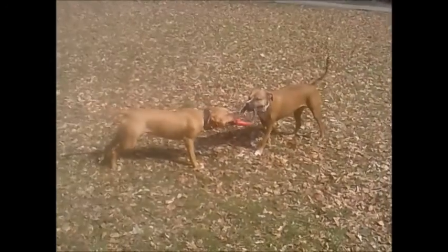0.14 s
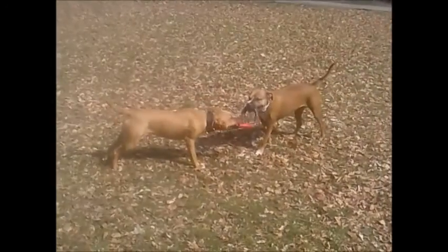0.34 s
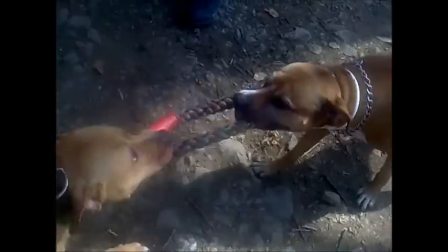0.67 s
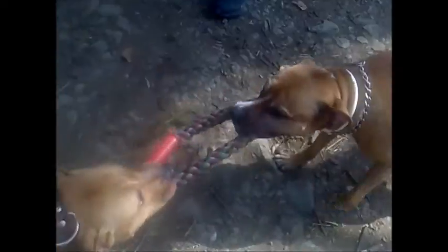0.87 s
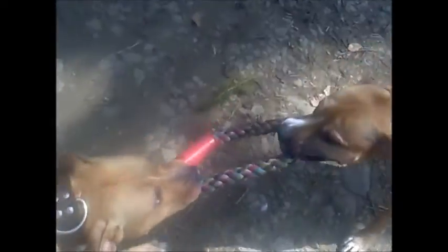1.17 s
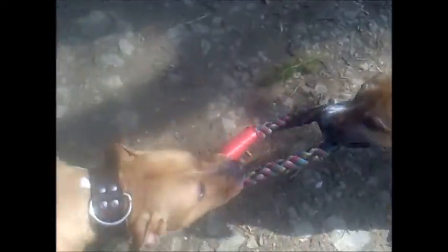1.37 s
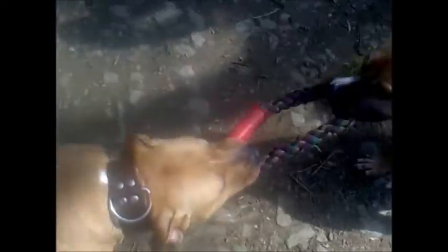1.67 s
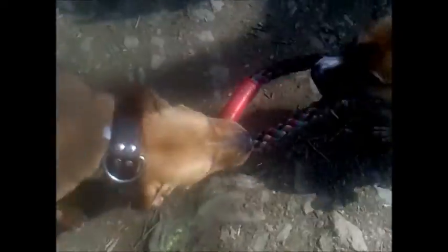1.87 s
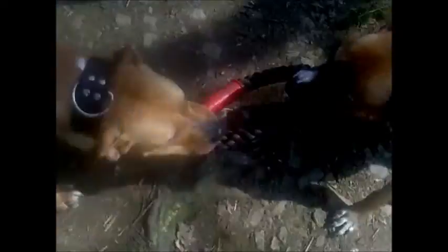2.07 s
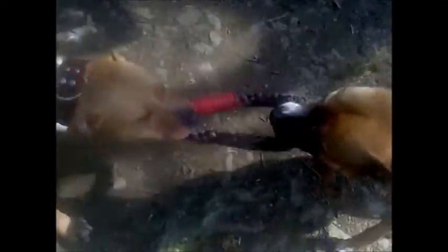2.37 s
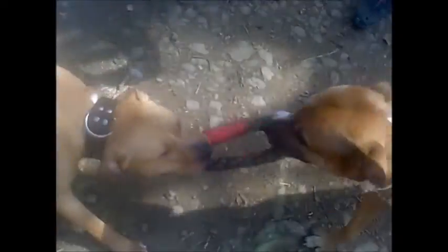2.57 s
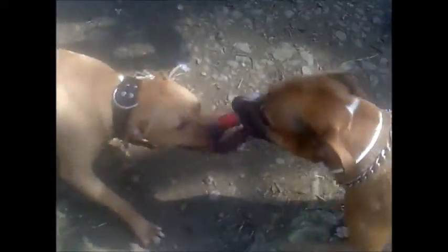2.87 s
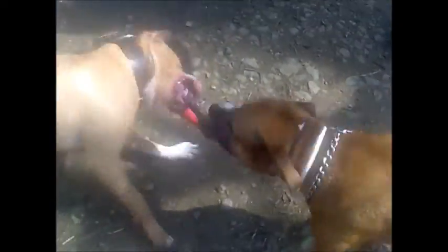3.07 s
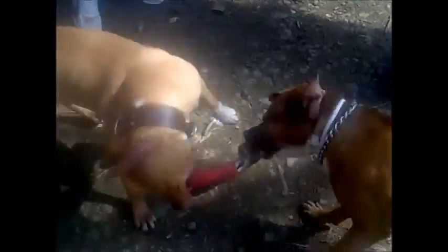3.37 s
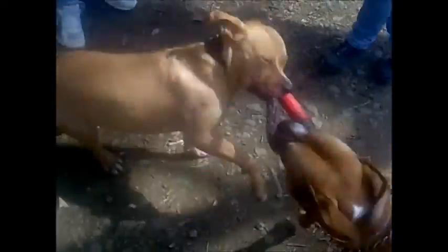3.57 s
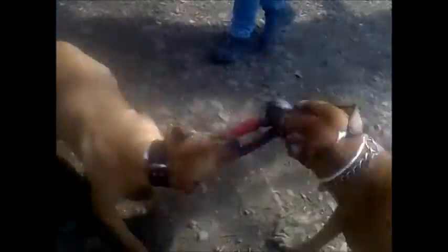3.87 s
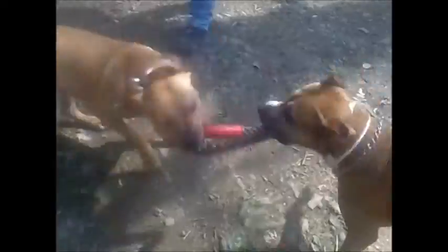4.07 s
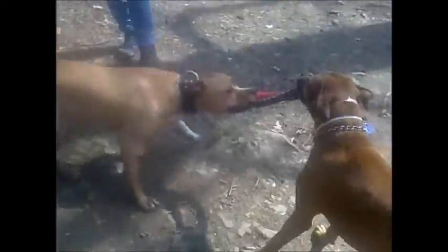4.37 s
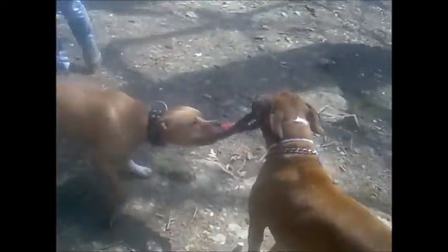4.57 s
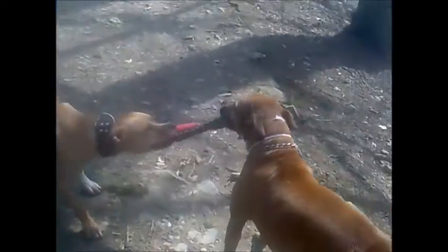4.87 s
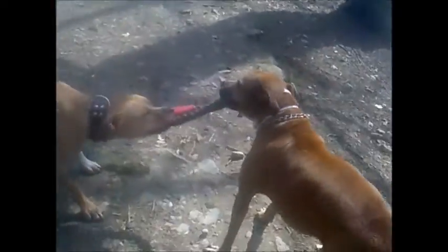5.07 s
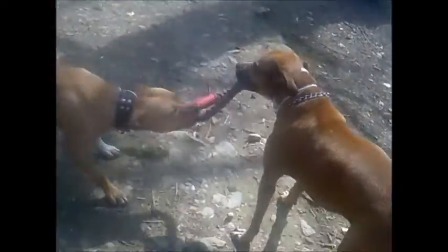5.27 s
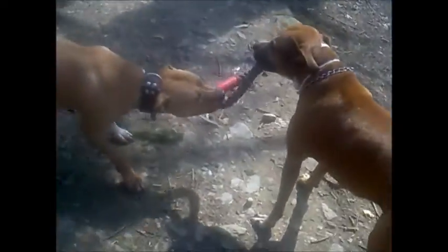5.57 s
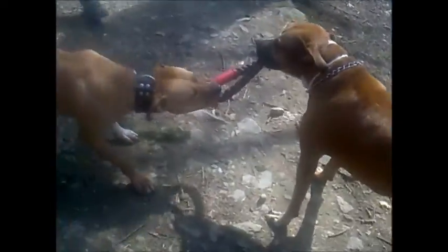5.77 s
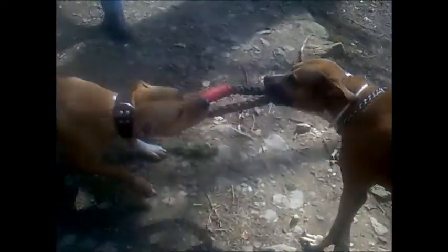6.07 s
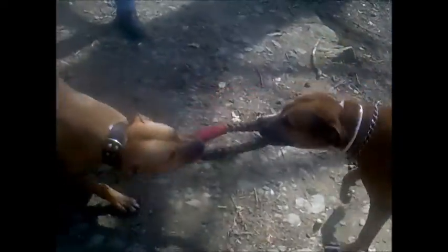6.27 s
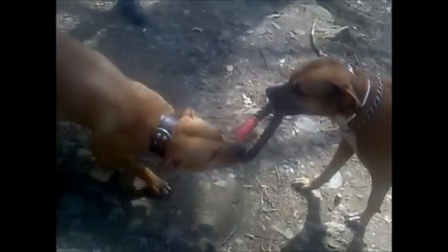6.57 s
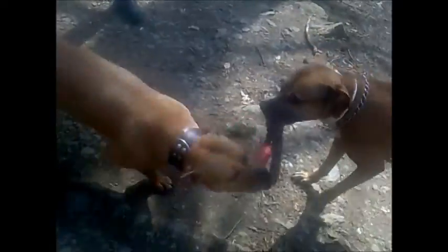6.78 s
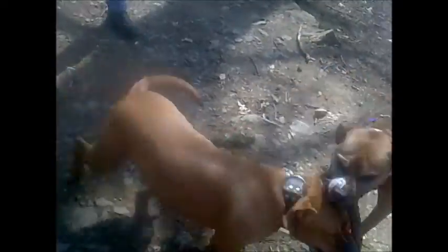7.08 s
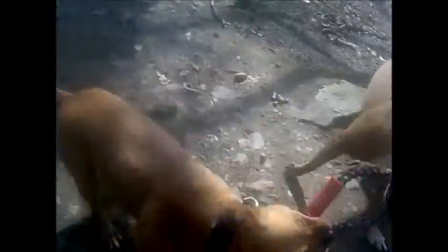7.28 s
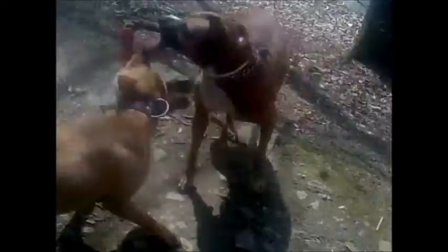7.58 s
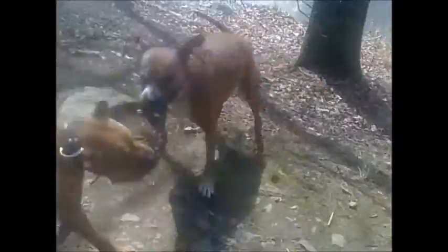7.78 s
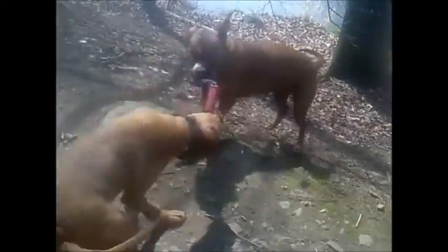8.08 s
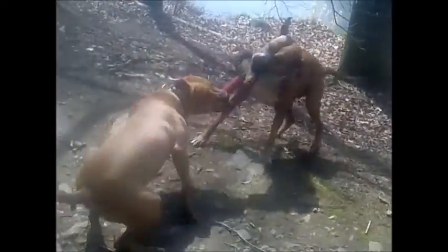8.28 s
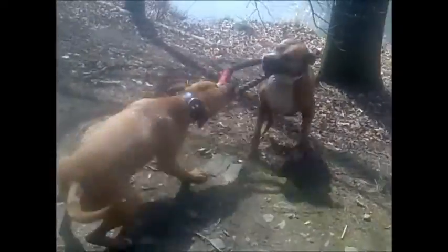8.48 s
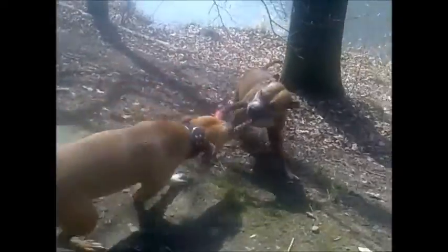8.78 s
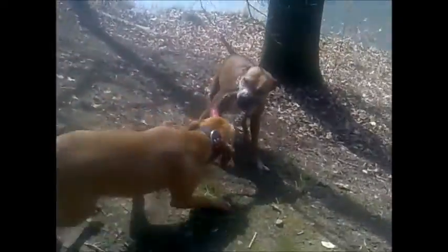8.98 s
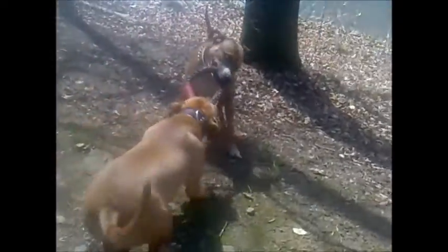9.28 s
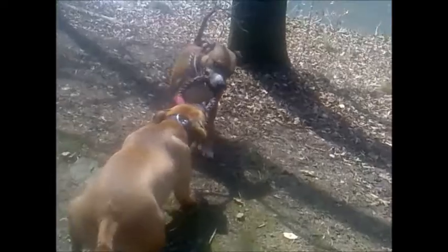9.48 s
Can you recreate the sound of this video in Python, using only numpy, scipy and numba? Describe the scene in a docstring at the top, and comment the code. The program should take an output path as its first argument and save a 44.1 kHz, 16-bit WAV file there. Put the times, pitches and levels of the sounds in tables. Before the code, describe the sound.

Outdoors, soft air and far birds last under a second before the sound drops out. Close rough dog growls follow on bare dirt, wet and raspy with chest resonance, jolted by tugging. Short choppy snarls tumble together, ease into subdued grumbling, then surge again. A steel collar clinks lightly, grit shifts underfoot, low handling rumble swells, and trees return a faint dull echo.

```python
"""Two big dogs tugging a rope toy

A short quiet scene on a leafy lawn with birds; after a brief dropout the dogs growl and snarl on bare dirt.
Uneven noisy vocal pulses, shaken by a slow flutter, ring moving throat resonances, chest, lips and teeth.
Long growls alternate with flurries of short snarls; a chain collar clinks as decaying steel modes.
Filtered noise makes crunches, grit, air and rumble; bird notes are gliding sines; the loudest peaks overload."""
import sys
import numpy as np
from scipy import signal
from scipy.io import wavfile
from scipy.ndimage import uniform_filter1d, map_coordinates
from numba import njit

SR = 44100
rng = np.random.default_rng(int(sys.argv[2]) if len(sys.argv) > 2 else 0)


def file_out(sig):
    """Save sig as 16-bit WAV at sys.argv[1]."""
    # one column per channel
    cols = np.atleast_2d(sig).T
    # limit, then scale
    lim = np.clip(cols, -1, 1)
    pcm = np.round(lim * 32767).astype(np.int16)
    wavfile.write(sys.argv[1], SR, pcm)


N = 425124
T = np.arange(N) / SR
TICKS = np.arange(0, T[-1] + .002, .001)  # control times, s

# silence between lawn and dirt: start_s, end_s
GAP_S = (0.685, 0.838)


def amp(db):
    """Decibels to gain."""
    return 10 ** (np.asarray(db) / 20)


def unit(x):
    """Scales to rms 1."""
    return x / np.sqrt(np.mean(x ** 2) + 1e-20)


def steady(x, seconds):
    """Holds the rms near 1 over the given time, keeping faster flicker."""
    size = max(int(seconds * SR), 8)
    power = uniform_filter1d(uniform_filter1d(x ** 2, size), size)
    return x / np.sqrt(abs(power) + 1e-12)


def wander(rate_hz):
    """Smooth random curve of rms 1 that changes about rate_hz times a second."""
    own_rng = np.random.default_rng(rng.integers(2 ** 30))
    knots = own_rng.standard_normal(int(T[-1] * rate_hz) + 2)
    return unit(map_coordinates(knots, [T * rate_hz], order=3, mode="nearest"))


def add(mix, start_s, sound):
    """Mixes a sound in at start_s."""
    part = mix[max(round(start_s * SR), 0):][:len(sound)]
    part += sound[:len(part)]


def colour(x, outline, size=4096):
    """Causal minimum-phase filter with the outline (hz, gain_db)."""
    hz, db = np.transpose(outline)
    log_bins = np.log(abs(np.fft.fftfreq(size, 1 / SR)) + 1)
    log_gain = np.log(amp(np.interp(log_bins, np.log(hz), db)))
    taps = np.fft.ifft(np.exp(np.conj(signal.hilbert(log_gain)))).real
    return signal.oaconvolve(x, taps[:size // 2])[:len(x)]


@njit
def smooth_twice(x, r):
    """Two one-pole low-passes in a row whose pole r may move."""
    out, a, b = np.zeros_like(x), 0j, 0j
    for i in range(len(x)):
        a = r[i] * a + (1 - r[i]) * x[i]
        b = r[i] * b + (1 - r[i]) * a
        out[i] = b
    return out


def resonate(x, hz, width_hz):
    """Steep resonance that may move: shift down to zero, smooth, shift back."""
    turn = np.exp(2j * np.pi * np.cumsum(hz * np.ones(len(x))) / SR)
    pole = np.exp(-np.pi * abs(width_hz) / SR) * np.ones(len(x))
    return 2 * (turn * smooth_twice(x / turn, pole)).real


def growls_and_snarls(first_width_factor=1.15, second_width_hz=360, third_width_hz=390, chest_width_hz=190,
                      lip_hz=3030, lip_width_hz=650, quiver=0.046, hold_s=0.032, even_s=0.037, hiss=0.14,
                      second_trim_db=1.5, chest_trim_db=-0.4, lip_trim_db=-4.0, rasp_trim_db=-1.14):
    """Pulses ring three throat resonances that move with the jaw, boom in the chest, buzz at lips and teeth."""
    # throat filter with a dip near 3.2 kHz: hz, gain_db
    muzzle_outline = [(100, -9), (290, -4.5), (480, 3.5), (800, 4.5), (980, 5.5), (1250, 3.5), (2200, 2.5),
                      (2600, 1), (3200, -24.5), (6000, -2)]
    # chest wall filter: hz, gain_db
    chest_outline = [(20, -31.5), (55, -2), (90, 2), (190, 2.5), (260, 3), (330, 8.5), (600, -5)]
    # teeth filter: hz, gain_db
    rasp_outline = [(2500, -11), (3700, 4.5), (4300, 1), (5300, 3), (6500, -1.5), (8500, -16.5),
                    (12000, -12), (16000, -31)]

    (effort_db, first_hz, first_width_hz, second_hz, third_hz,
     second_db, third_db, chest_db, lip_db, rasp_db, damping) = jaw()
    pulses, puffs, chest_hz = larynx()
    drive = bounce(pulses)
    throat = colour(drive, muzzle_outline)
    shake = 1 + quiver * wander(30)  # the shaking head bends throat and lip resonances together

    first = resonate(throat, first_hz * shake, first_width_factor * first_width_hz)
    voice = amp(resonance_flicker()) * steady(first, hold_s)
    second = resonate(throat, second_hz * shake, damping * second_width_hz)
    voice += amp(second_db + second_trim_db + resonance_flicker()) * steady(second, hold_s)
    third = resonate(throat, third_hz * shake, damping * third_width_hz)
    voice += amp(third_db + resonance_flicker()) * steady(third, hold_s)
    voice = steady(voice, even_s)

    boom = resonate(colour(drive, chest_outline), chest_hz, damping * chest_width_hz)
    voice += amp(chest_db + chest_trim_db) * steady(boom, hold_s)
    spray = lips(puffs + hiss * rng.standard_normal(N))
    buzz = resonate(spray, lip_hz * shake, damping * lip_width_hz)
    voice += amp(lip_db + lip_trim_db) * steady(buzz, hold_s)
    voice += amp(rasp_db + rasp_trim_db) * steady(colour(spray, rasp_outline), hold_s)
    return voice * effort(effort_db)


def larynx(fold_hz=150, jitter=.28, shimmer_db=4.0, flutter_jitter=.12, lurch_db=2.5, puff_s=0.0099, leak=0.32):
    """Slack folds slap shut unevenly, each slap freeing a puff of air; loose tissue shakes them in a flutter."""
    # voice state: time_s, flutter_hz, flutter_depth_db, roughness (0-1), chest_hz
    voice_state = [(1.0, 58, 3.5, .45, 140), (2.1, 58, 3.2, .5, 135), (2.9, 58, 3.5, .5, 120),
                   (3.3, 58, 2.5, .55, 180), (4.3, 57, 2.5, .5, 180), (4.7, 70, 4, .55, 150),
                   (5.5, 70, 4, .55, 140), (5.9, 56, 3.5, .5, 125), (6.5, 54, 4.5, .5, 135),
                   (7.1, 56, 2, .55, 160), (8.0, 56, 2.5, .5, 190), (9.1, 55, 4.5, .55, 195)]
    s, *columns = np.transpose(voice_state)
    flutter_hz, depth_db, rough, chest_hz = (np.interp(T, s, c) for c in columns)

    shakes = np.cumsum(flutter_hz * np.exp(flutter_jitter * wander(60))) / SR
    flutter = amp(depth_db * np.cos(2 * np.pi * shakes) + lurch_db * wander(70))
    cycles = np.cumsum(fold_hz * np.exp(jitter * wander(170))) / SR
    closures = np.diff(np.floor(cycles), prepend=0)
    slaps = closures * amp(shimmer_db * wander(200)) * flutter
    opening = unit(signal.lfilter([1], [1, -np.exp(-1 / (puff_s * SR))], slaps))
    puffs = unit((opening + leak * flutter) * rng.standard_normal(N))
    return (1 - rough) * unit(slaps) + rough * puffs, puffs, chest_hz


def bounce(x, delay_s=0.00301, strength=0.45, sway=0.098):
    """A close reflection combs the tone; its delay sways as the heads move."""
    late = np.arange(N) - SR * delay_s * (1 + sway * wander(4))
    return x - strength * np.interp(late, np.arange(N), x)


def resonance_flicker(depth_db=2.0, rate_hz=45):
    """Random level in dB, drawn for each resonance, so that their balance flickers."""
    return depth_db * wander(rate_hz)


def lips(x, count=9, flicker_db=5.0, flicker_hz=22):
    """Flapping lips favour now one, now another narrow band of the spray."""
    out = x
    for hz in np.geomspace(2600, 8000, count):
        out = out + (amp(flicker_db * wander(flicker_hz)) - 1) * resonate(x, hz, hz / 10)
    return out


def effort(db, level_db=-0.84, loud_db=-13.0, push=0.14, heave_db=1.2, heave_hz=35, jolt_s=0.004):
    """Voice gain: effort that heaves at random, jolted by tugs on the rope and pushed harder at the peaks."""
    # rope tugs: time_s, jolt_db
    tugs = [(1.279, 3.5), (1.379, 6), (1.431, 7.5), (2.139, 7), (2.457, 8), (2.775, 5.5), (3.235, -0.5),
            (3.727, 5.5), (4.336, 4), (6.37, -5), (6.472, 5.5), (6.692, 12), (6.87, 9), (6.911, 11),
            (6.956, 9), (8.191, 4), (8.719, 1.5), (8.965, 7), (8.98, 1), (9.219, 8), (9.275, 5)]
    jolts_db = sum(tug_db * np.exp(-((TICKS - s) / jolt_s) ** 2) for s, tug_db in tugs)
    db = db + np.interp(T, TICKS, jolts_db) + heave_db * wander(heave_hz)
    return amp(level_db + db + push * np.maximum(db - loud_db, 0))


def jaw(jaw_s=.016, easy_db=-19, chest_lag=0.38):
    """Effort and mouth shape: the loudest call leads, curled lips brighten it, the chest lags behind."""
    # lips drawn back from the teeth: centre_s, half_length_s, amount (1 = full curl)
    lip_curls = [(1.704, 0.1, 1.05), (2.642, 0.096, 1), (5.276, .07, 0.9), (6.205, 0.058, 1.1),
                 (7.007, 0.029, 0.4), (8.75, 0.048, 0.48), (9.423, .065, 1.0)]
    # shifts at full curl
    curl_hz, curl_second_db, curl_third_db, curl_lip_db, curl_rasp_db = 484, 14.5, 10.5, 5, 5

    levels_db, throats = zip(*calls())
    db = np.max(levels_db, axis=0)
    power = amp(np.array(levels_db) - db) ** 2
    # the jaw needs a moment to change shape
    weights = uniform_filter1d(power, max(round(jaw_s / TICKS[1]), 1), axis=1)
    first_hz, first_width_hz, second_hz, third_hz, second_db, third_db, chest_db, lip_db, rasp_db, damping = (
        sum(w * value for w, value in zip(weights, column)) / weights.sum(0) for column in zip(*throats))

    curl = sum(amount * np.exp(-((TICKS - s) / half_s) ** 2) for s, half_s, amount in lip_curls)
    # the chest gains only part of each dB above an easy growl
    chest_db = np.minimum(chest_db - chest_lag * (db - easy_db), 0)
    controls = (db, first_hz, first_width_hz, second_hz + curl_hz * curl, third_hz,
                second_db + curl_second_db * curl, third_db + curl_third_db * curl, chest_db,
                lip_db + curl_lip_db * curl, rasp_db + curl_rasp_db * curl, damping)
    return [np.interp(T, TICKS, control) for control in controls]


def calls(closing_per_db=0.04, growl_tail_db=-1.5, snarl_tail_db=-10.5):
    """Yields every growl and snarl as its effort in dB and the shape of its throat."""
    # one curve a long growl: time_s, effort_db, first_hz
    growl_curves = [
        [(1.0, -51.5, 570), (1.094, -22, 577), (1.178, -21, 804), (1.35, -6, 773), (1.364, -12.5, 760),
         (1.374, -9.5, 767), (1.562, -19, 725), (1.606, -15, 645), (1.702, -20, 616), (1.78, -46, 547)],
        [(2.08, -47, 853), (2.1, -23.5, 865), (2.15, -21, 850), (2.32, -14.5, 527), (2.65, -16.5, 634),
         (2.69, -19, 694), (2.754, -25.5, 545), (3.004, -25, 668), (3.06, -48, 646)],
        [(4.5, -59, 599), (4.566, -36, 540), (4.688, -24.5, 744), (4.782, -26, 760), (4.818, -29.5, 650),
         (5.13, -25.5, 720), (5.26, -22, 587), (5.522, -34, 677), (5.58, -64, 655)],
        [(5.76, -52, 792), (5.778, -32.5, 840), (5.918, -35, 757), (6.03, -42, 596)],
        [(6.03, -62, 631), (6.046, -33.5, 670), (6.144, -19, 644), (6.218, -17, 573), (6.23, -16, 600),
         (6.28, -22.5, 554), (6.504, -23, 592), (6.634, -29, 627), (6.66, -26, 686)],
        [(6.66, -25.5, 800), (6.824, -26, 940), (6.964, -13.5, 824), (7.156, -4.5, 910), (7.168, -11, 880),
         (7.18, -4.5, 867), (7.26, -7.5, 894), (7.3, -23, 905)],
        [(8.57, -45, 634), (8.618, -10.5, 684), (8.706, -25, 755), (8.716, -20.5, 720), (8.776, -28.5, 661),
         (8.846, -24, 726), (8.9, -31, 660)],
        [(8.9, -27, 681), (8.924, -20.5, 693), (9.034, -15, 870), (9.116, -25, 716), (9.142, -14.5, 715),
         (9.182, -23.5, 760), (9.378, -26.5, 774), (9.408, -17.5, 860), (9.5, -45.5, 890)],
    ]
    # one throat a growl: first_width_hz, second_hz, third_hz,
    # against the first resonance: second_db, third_db,
    # against the levelled sum of the three resonances: chest_db, lip_db, rasp_db;
    # width factor of the other resonances
    growl_throats = [(290, 1120, 2056, -10.5, -3.5, -15.5, -13, -24, 1.07),
                     (302, 1220, 1980, -9.5, -4, -12, -22.5, -24.5, 1.23),
                     (190, 1350, 1980, -8, -5.5, -17, -29, -24.5, 0.78),
                     (256, 1330, 1680, -5, -7.5, -10, -29, -24.5, 1.02),
                     (167, 1200, 2000, -10, -2.5, -14, -16.5, -25.5, 0.78),
                     (86, 1282, 1745, -4, -5.5, -12.5, -32, -30, 1.41),
                     (173, 1530, 2120, -9, -9, -19, -40, -22.5, 0.74),
                     (118, 1253, 2070, -2, -5, -13.5, -25.5, -27, 0.97)]
    # short snarls: start_s, length_s, effort_db, swell_db (start to end), first_hz, first_width_hz,
    # second_hz, third_hz, against the first resonance: second_db, third_db,
    # against the levelled sum of the three resonances: chest_db
    snarl_rows = [(3.109, 0.057, -5.5, -4.5, 994, 270.0, 1609.0, 1826, 0.5, 9, -15),
                  (3.186, 0.059, -8, -2.5, 825, 280.0, 1320, 1790, 6, 1.5, -13),
                  (3.273, 0.041, -16.5, -6, 830, 330.0, 1220, 1650, -0.5, -8, -21),
                  (3.318, 0.066, -18.5, -4, 624, 274, 1300, 2200.0, 0.5, -5, -17),
                  (3.429, 0.022, -8, -3, 790, 285, 1306.0, 1700, 7, -8.0, -20),
                  (3.476, 0.1, -7.5, -4, 665, 300.0, 1255, 1700, 2.0, 3, -13),
                  (3.588, 0.067, -15.5, -3.0, 800, 333, 1210, 1754.0, 1.5, -3, -8),
                  (3.68, 0.012, -6, 2.5, 642, 119, 1370, 1930, -8.5, -4.5, -16),
                  (3.717, 0.086, -17, -2.5, 576, 280.0, 1530, 1780, 0.5, -8, -13),
                  (3.79, 0.09, -14.5, -9.5, 504, 266, 1430, 1720, -3.5, -10.5, -11.5),
                  (3.887, 0.053, -15.5, 1.5, 580, 293, 1520, 1930, 1.0, -11.0, -11.5),
                  (4.018, 0.02, -4.5, -2.5, 1060, 180.0, 1390, 1690, -1.5, -16, -20),
                  (4.057, 0.073, -7, 3.5, 954, 212, 1500, 1625, -8.5, -4.5, -16),
                  (4.186, 0.072, -8, -1, 710, 327, 1490, 1720, -3, -14, -20),
                  (4.274, 0.085, -15.0, 0.5, 725, 288, 1110, 1840, 0, -5.5, -16.5),
                  (7.035, 0.035, -7.5, -1.5, 840, 110, 1510, 1660, -17, 6.5, -15),
                  (7.19, 0.066, -7, -3, 920, 160, 1290, 1880, 0.5, -19, -22),
                  (7.317, 0.072, -10.5, 2, 560, 290.0, 1330, 1980, -3.5, -7.5, -15.5),
                  (7.402, 0.047, -7.5, 0.5, 565, 198, 1360, 1730, 0, -7, -13.5),
                  (7.457, 0.12, -16.5, -3, 620, 300.0, 1480, 1790, -11, -3, -15.5),
                  (7.577, 0.05, -12, 1.5, 570, 158, 1535.0, 1790, -9, -14, -17),
                  (7.636, 0.05, -17.5, 0, 456.0, 200.0, 1370, 1880, -3.5, -2, -9),
                  (7.713, 0.12, -11, 1.5, 640, 240.0, 1360, 1630, -5, -10, -15),
                  (7.84, 0.081, -8, 0.5, 643, 320.0, 1590, 1730, -10.5, -10.5, -13),
                  (7.936, 0.026, -4.5, 1, 890, 340.0, 1120, 1710, -16, -13.5, -16.5),
                  (7.969, 0.045, -11.5, -4.5, 614, 380.0, 1260, 2010, 1, -1.5, -17),
                  (8.036, 0.028, -9, 7.5, 750, 248, 1270, 1930, -0.5, -7, -19),
                  (8.09, 0.06, -11, 4.5, 885, 310.0, 1210, 1750, -4, 0, -15),
                  (8.175, 0.061, -11.5, -1, 960, 278, 1320, 1830, -3.0, -2.5, -17),
                  (8.276, 0.068, -9.5, -2.5, 840, 310, 1278.0, 1840, 5.5, -3.0, -14.5),
                  (8.615, 0.03, -13.5, -5, 684, 149, 1500, 2150, -28, -11.5, -31),
                  (9.019, 0.015, -11, -0.5, 820, 160, 1310, 1900, 9, 1, -17)]
    snarl_lip_db, snarl_rasp_db, snarl_width_factor = -28.5, -24.5, 0.99

    for curve, throat in zip(growl_curves, growl_throats):
        s, db, first_hz = np.transpose(curve)
        level_db = np.interp(TICKS, s, db) + edges(s[0], s[-1], growl_tail_db)
        yield level_db, (np.interp(TICKS, s, first_hz), *throat)

    for start_s, length_s, db, swell_db, first_hz, *throat in snarl_rows:
        end_s = start_s + length_s
        outline_db = np.interp(TICKS, [start_s, end_s], [-swell_db / 2, swell_db / 2])
        outline_db = outline_db + edges(start_s, end_s, snarl_tail_db)
        # the jaw closes as a snarl fades
        first_hz = first_hz * np.exp(closing_per_db * np.maximum(outline_db, -20))
        yield db + outline_db, (first_hz, *throat, snarl_lip_db, snarl_rasp_db, snarl_width_factor)


def edges(start_s, end_s, tail_db, attack_db_per_s=1092, release_db_per_s=743, grumble_db_per_s=199.5):
    """Outline of a call in dB: quick attack, hold, quick release into a slower dying grumble."""
    before_s, after_s = np.maximum(start_s - TICKS, 0), np.maximum(TICKS - end_s, 0)
    release_db = np.maximum(-release_db_per_s * after_s, tail_db - grumble_db_per_s * after_s)
    return -attack_db_per_s * before_s + release_db


def chain(level_db=-1.5, scrape_db=2.0, scrape_s=0.0042, rise_s=.003):
    """Each knock of the collar rings a slightly different steel link, with a short scrape."""
    # knocks: start_s, relative level_db
    knocks = [(3.5743, -29.5), (3.69, -23.5), (3.7116, -14.5), (3.7254, -37), (3.9614, -29), (4.143, -25),
              (4.1844, -31), (4.3984, -30), (4.482, -46), (7.4084, -20), (7.434, -23), (7.5827, -32),
              (7.648, -29), (7.7214, -33), (8.109, -31), (8.2556, -32), (8.295, -34)]
    # modes of a link: nominal hz, nominal level_db, t60_s
    link_modes = [(4264, -9, .05), (5496, -4, .05), (7300, -9, .04), (9500, -9, .05), (10400, -5, .06),
                  (10630, -3, .09), (11990, -12, .05), (14800, -13, .05), (15400, -11, .05)]
    out, t = np.zeros(N), np.arange(SR // 5) / SR
    hz, db, t60_s = np.transpose(link_modes)[:, :, None]
    rise = 1 - np.exp(-t / rise_s)
    for start_s, knock_db in knocks:
        detune, strength, phase = rng.standard_normal((3, len(link_modes), 1))
        decay = amp(db + 2 * strength - 60 * t / t60_s)
        ring = decay * np.sin(2 * np.pi * (hz * (1 + 0.003 * detune) * t + phase))
        bright_noise = np.diff(rng.standard_normal(len(t) + 1)) / 2
        scrape = amp(scrape_db) * np.exp(-t / scrape_s) * bright_noise
        add(out, start_s, amp(knock_db + level_db) * (ring.sum(0) + scrape) * rise)
    return out


def trees(x, t60_s=0.94, wet_db=-22.5):
    """Trunks and slope scatter a faint, dull echo: sparse decaying random taps."""
    t = np.arange(SR) / SR
    sparse = rng.standard_normal(SR) * (rng.random(SR) < .04)
    taps = sparse * amp(-60 * t / t60_s) * (t > .012)
    tail = colour(taps / np.linalg.norm(taps), [(150, -7), (600, -8), (2200, 1), (8000, -17)])
    return amp(wet_db) * signal.oaconvolve(x, tail)[:N]


def ground(bump_db=-3.5, bump_s=0.041, crunch_db=-8.0, crunch_s=0.025, treble_trim_db=7.0):
    """Dull bumps of low noise and short two-band crunches and clicks, all decaying exponentially."""
    # bumps on the lawn: start_s, relative level_db
    lawn_bumps = [(0.009, -33), (0.071, -38), (0.184, -33), (0.229, -47), (0.372, -36), (0.429, -41),
                  (0.498, -49), (0.58, -39), (0.623, -35), (0.675, -27.5)]
    # short crunches and clicks, some at the edges of the silence: start_s, relative level_db, relative treble_db
    crunches = [(0.438, -41, -17), (0.476, -38, -24), (0.504, -46, -26), (0.586, -34.5, -28),
                (0.622, -35.5, -25), (0.675, -40, -18), (0.839, -58.5, -2), (0.969, -58.5, 8),
                (1.94, -36, -11), (5.682, -27, -21.5), (8.526, -29.5, -17), (9.595, -28.5, -35)]
    thud_outline = [(25, -14), (60, -1), (100, 4.5), (170, -14), (350, -25.5), (1500, -48)]
    body_outline = [(100, -1), (700, 4.5), (2100, -1.5), (3000, -28), (9000, -41)]
    treble_outline = [(1500, -18), (4500, 4), (9000, -10), (15000, -13)]
    out, t = np.zeros(N), np.arange(SR // 4) / SR
    for start_s, db in lawn_bumps:
        thud = unit(colour(rng.standard_normal(len(t)), thud_outline))
        add(out, start_s, amp(db + bump_db) * thud * np.exp(-t / bump_s))
    for start_s, db, treble_db in crunches:
        noise = rng.standard_normal(len(t)) * amp(4.5 * rng.exponential(1, len(t)))
        body = unit(colour(noise, body_outline))
        treble = unit(colour(noise, treble_outline))
        crunch = body + amp(treble_db + treble_trim_db) * treble
        add(out, start_s, amp(db + crunch_db) * crunch * np.exp(-t / crunch_s))
    return out


def scuffle(level_db=6.0, grains_per_s=7000):
    """Many small random grains of grit shift under the paws on the dirt."""
    # scuffling: time_s, relative level_db
    scuffle_curve = [(0.92, -90), (1.01, -65), (1.33, -53), (1.5, -51), (2.1, -68), (2.32, -59),
                     (2.91, -58), (4.25, -48), (4.51, -60), (5.8, -66), (6.4, -53), (6.81, -60), (7.2, -51),
                     (8.38, -55), (8.46, -47.5), (8.56, -62), (9.05, -46.5), (9.55, -59)]
    # grit filter: hz, gain_db
    grit_outline = [(300, -8), (1500, -4.5), (5000, 8), (8500, 0), (12000, 1.5), (15500, 5)]
    sizes = amp(1.5 * np.minimum(rng.exponential(1, N), 4))
    grains = rng.standard_normal(N) * (rng.random(N) < grains_per_s / SR) * sizes
    gain = amp(np.interp(T, *np.transpose(scuffle_curve)) + level_db)
    return unit(colour(grains, grit_outline)) * gain * (T > GAP_S[1])


def birds(waver=0.0085):
    """Far whistled glides over the lawn: sines of wavering pitch and level."""
    # one curve a note: time_s, nominal pitch_hz, nominal level_db
    bird_notes = [
        [(0, 4400, -63), (.06, 4150, -59), (.1, 4350, -63), (.15, 4900, -59)],
        [(.07, 2620, -60), (.13, 2590, -55), (.29, 2620, -54), (.35, 2860, -57)],
        [(.23, 5600, -63), (.255, 4350, -56), (.285, 3420, -62)],
        [(.38, 7600, -68), (.41, 5200, -58), (.44, 4430, -56), (.51, 4120, -59), (.58, 4670, -60)],
    ]
    out, drift, fade_db = np.zeros(N), 1 + waver * wander(216), 2 * wander(93)
    for note in bird_notes:
        s, hz, db = np.transpose(note)
        t = np.arange(s[0], s[-1], 1 / SR)
        pitch_hz = np.interp(t, s, hz) * drift[:len(t)]
        tone = np.sin(2 * np.pi * np.cumsum(pitch_hz) / SR)
        gain = amp(np.interp(t, s, db) + fade_db[:len(t)])
        add(out, s[0], gain * tone * signal.windows.tukey(len(t), .15))
    return out


def air(lawn_db=-53.5, woods_db=-56 + 1.5, rumble_db=-4.0):
    """Filtered noise, one colour for each scene; wind and handling rumble under the second."""
    # open air over the lawn: hz, gain_db
    lawn_outline = [(24, -34), (40, 0), (117, -4), (170, -7), (333, -20), (881, -17.5), (1730, -23.5),
                    (2570, -22), (3300, -31.5), (15500, -33)]
    # open air in the woods: hz, gain_db
    woods_outline = [(24, -47), (40, -27), (197, -2), (280, -3), (377, 0), (577, 4.5), (859, -4.5),
                     (1220, 2), (1410, -1), (2510, -3), (4920, -23), (6320, -30), (15500, -15)]
    # wind and handling on the microphone: time_s, relative level_db
    rumble_curve = [(0.85, -71), (1.3, -58), (1.9, -57), (2.3, -49), (3.0, -54.5), (4.2, -57), (4.5, -60.5),
                    (5.2, -41), (5.6, -57), (6.2, -62), (6.6, -34.5), (7.1, -36), (7.5, -60), (8.4, -46.5),
                    (9.63, -61)]
    rumble_outline = [(12, -15.5), (30, -11.5), (75, -4), (120, -17.5), (300, -34), (1000, -87.5)]
    lawn = amp(lawn_db) * unit(colour(rng.standard_normal(N), lawn_outline))
    woods = amp(woods_db) * unit(colour(rng.standard_normal(N), woods_outline))
    rumble = steady(colour(rng.standard_normal(N), rumble_outline), 0.15)
    rumble *= amp(np.interp(T, *np.transpose(rumble_curve)) + rumble_db)
    return np.where(T < GAP_S[0], lawn, woods + rumble)


def scene():
    """Dogs and collar among the trees, over bumps, crunches, grit, birds and open air."""
    dogs = growls_and_snarls() + chain()
    return (dogs + trees(dogs) + ground() + scuffle() + birds() + air())[None]


def record(dry, knee=11.8, edge_hz=16000):
    """The microphone overloads at peaks; the sound drops out between the scenes; then a low-pass."""
    limited = dry / (1 + abs(dry) ** knee) ** (1 / knee)
    limited = limited * np.where((T > GAP_S[0]) & (T < GAP_S[1]), 0, 1)
    low_pass = signal.firwin(511, edge_hz, window=("kaiser", 9), fs=SR)
    return signal.oaconvolve(limited, low_pass[None], "same")


dry = scene()
out = record(dry)
file_out(out)
```